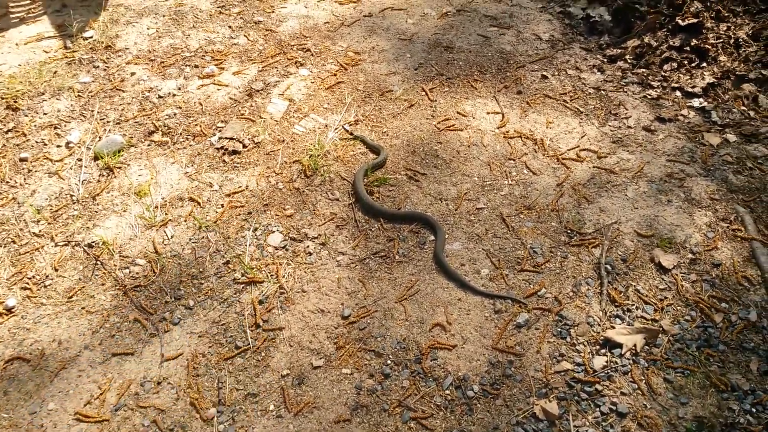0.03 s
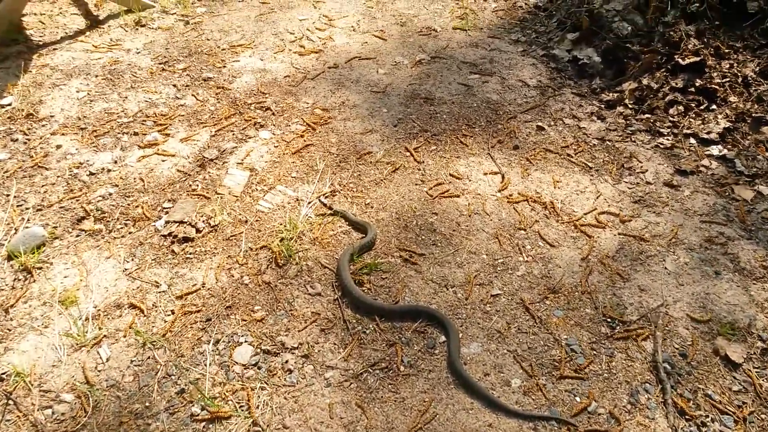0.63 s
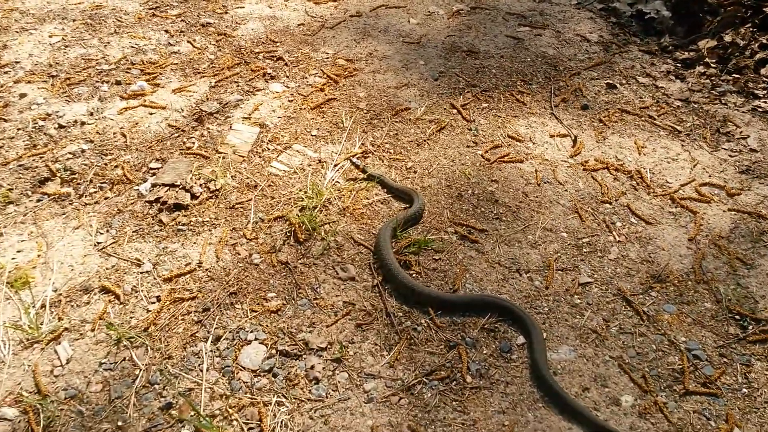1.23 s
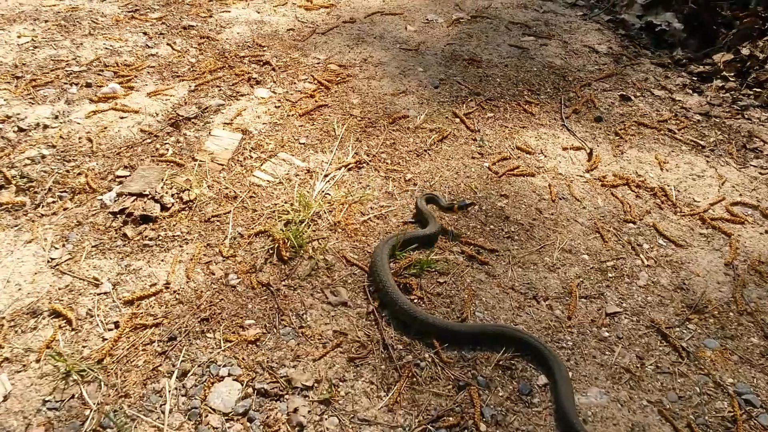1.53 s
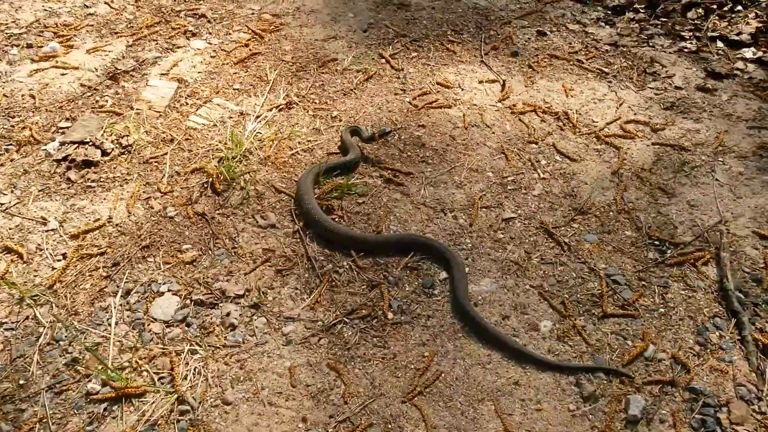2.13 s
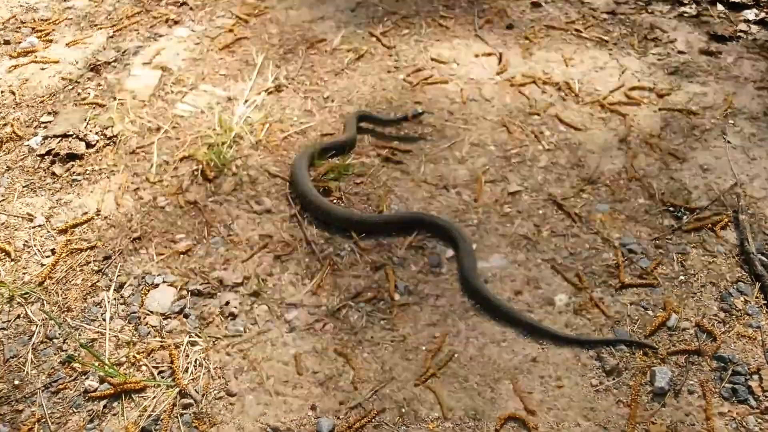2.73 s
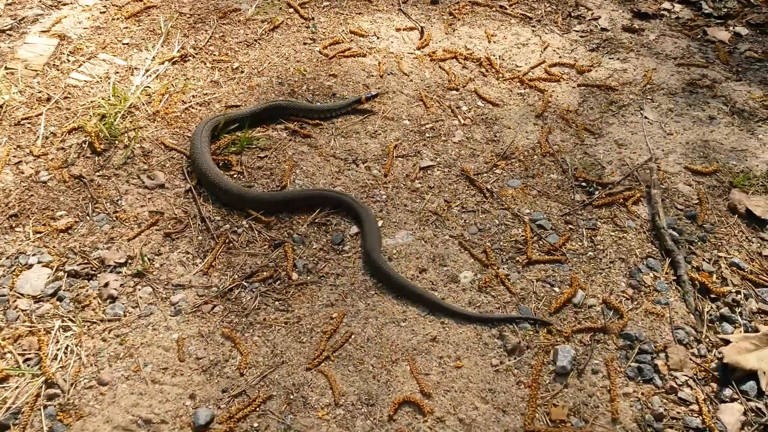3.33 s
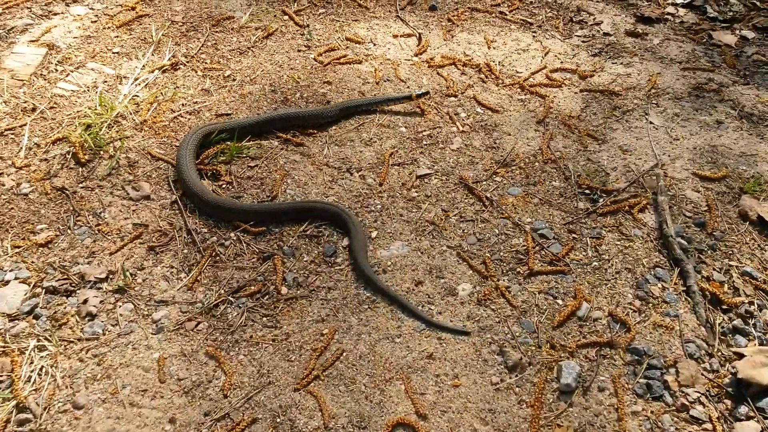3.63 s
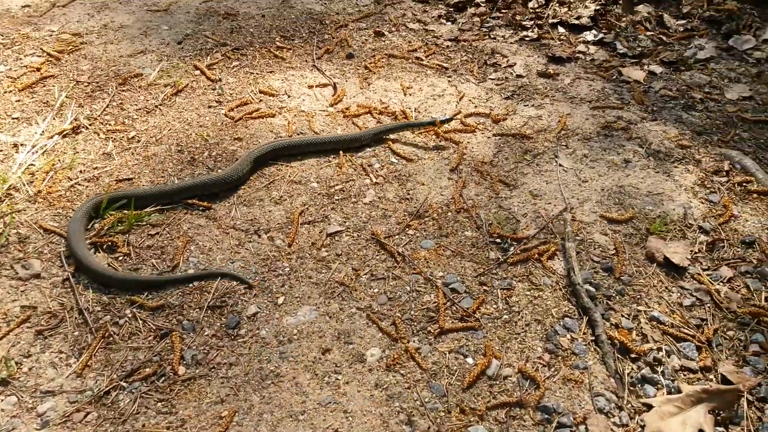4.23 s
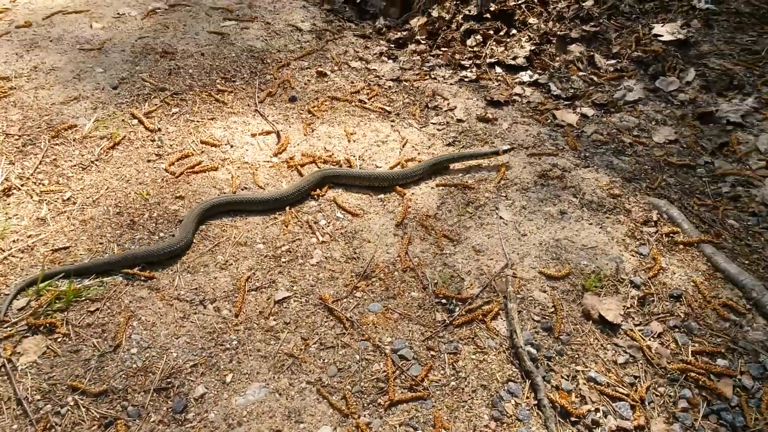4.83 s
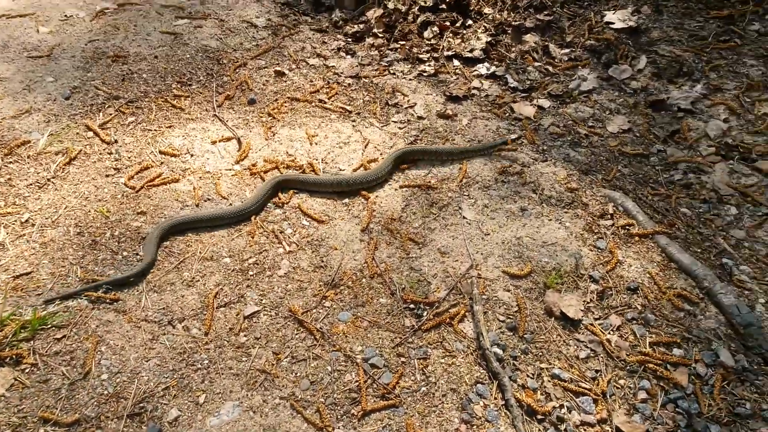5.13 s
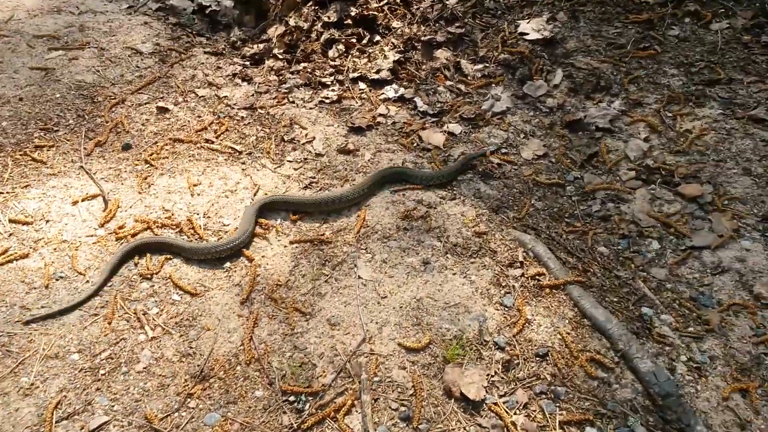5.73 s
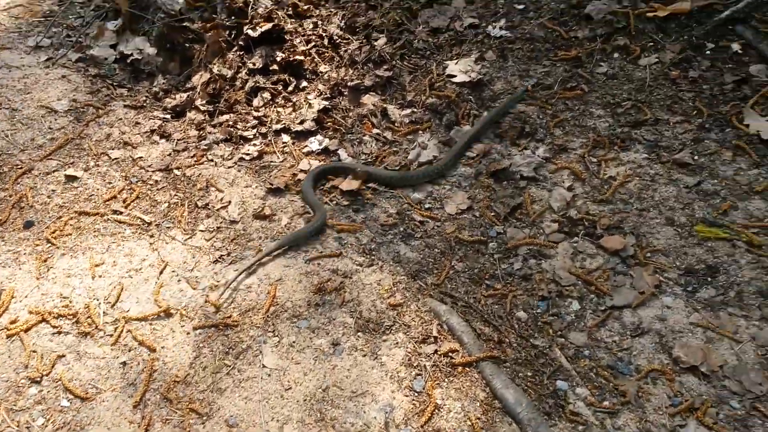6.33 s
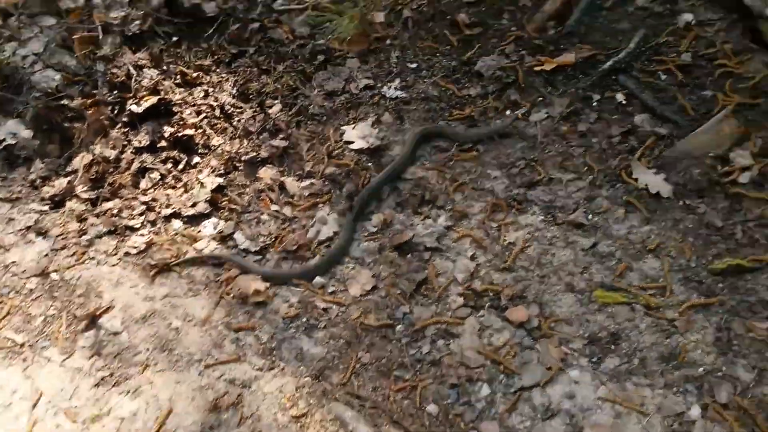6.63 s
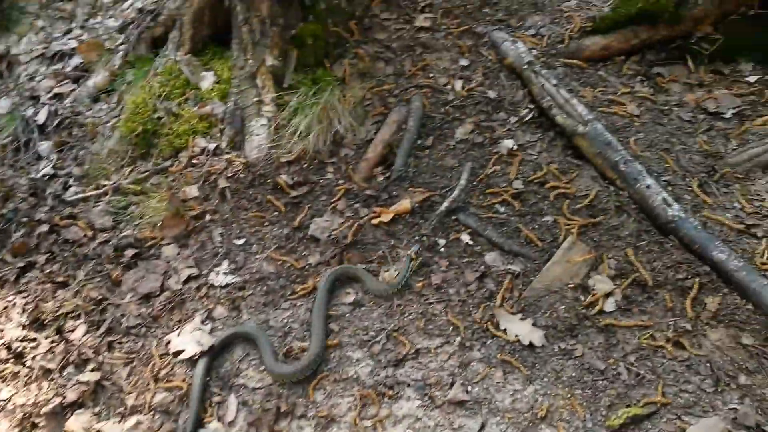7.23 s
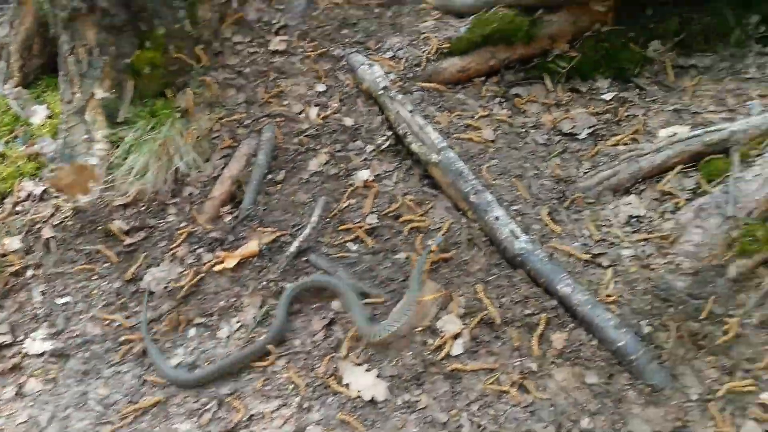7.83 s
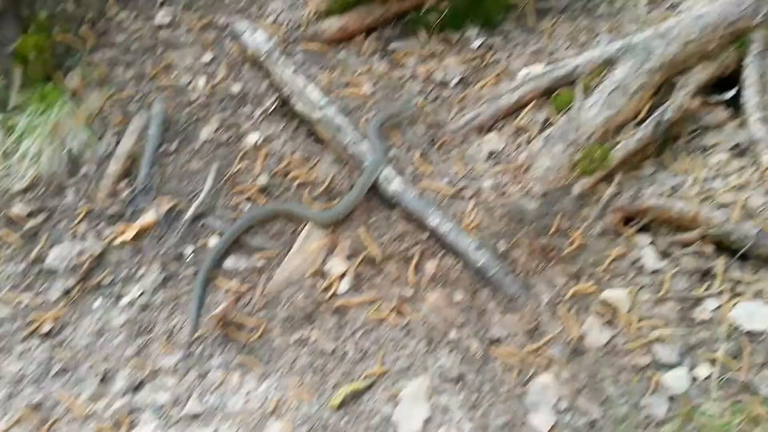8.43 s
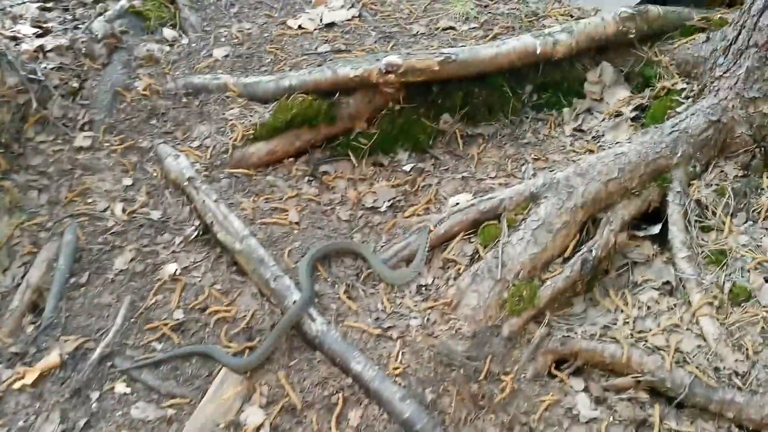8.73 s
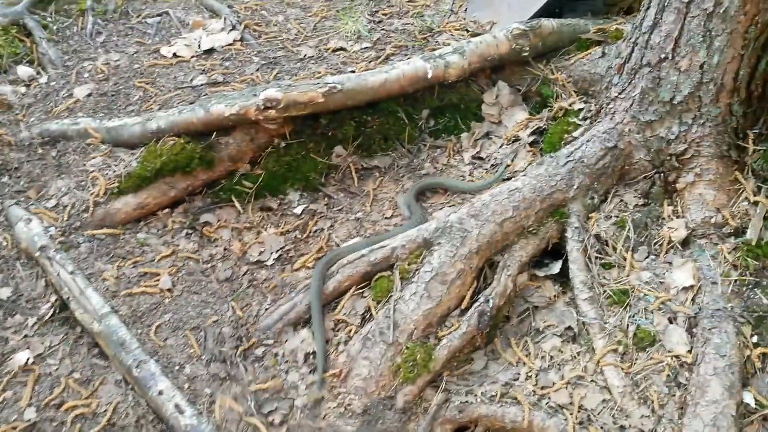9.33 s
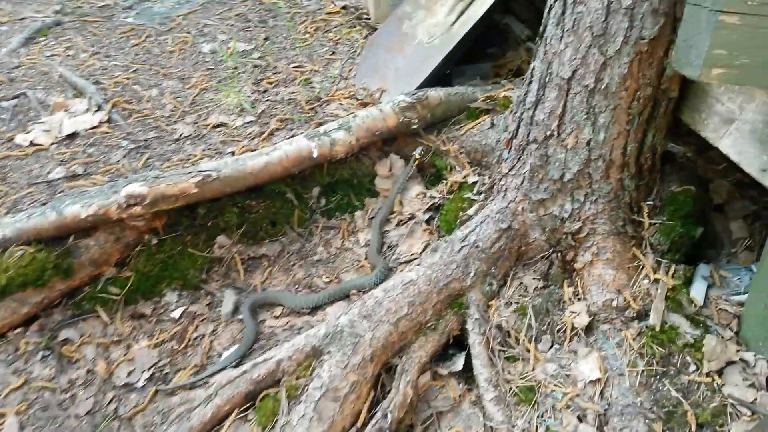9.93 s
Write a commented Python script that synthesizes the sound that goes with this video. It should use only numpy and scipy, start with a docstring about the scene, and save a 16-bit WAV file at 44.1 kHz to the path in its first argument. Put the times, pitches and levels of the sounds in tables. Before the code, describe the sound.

Close handling bumps and rubs, then the faint, growing rustle of a snake crossing dry forest litter as light footsteps follow.

```python
"""A snake slides over dry needles and leaves, which hiss by friction and crackle by brittle fracture.
Someone follows on the forest path with a hand-held camera, crunching grit underfoot; both are heard
at the right microphone port. Fingers bump and rub the left port, which the hand shades.
Each port has its own handling rumble and hiss; a small bird calls faintly and the camera whines softly."""
import sys
import numpy as np
from scipy import signal
from scipy.fft import rfft, irfft, next_fast_len
from scipy.io import wavfile
from scipy.ndimage import uniform_filter1d

SR = 44100
rng = np.random.default_rng(int(sys.argv[2]) if len(sys.argv) > 2 else 0)


def persist_wave(psi):
    """Save psi, clipped to +-1, as 16-bit WAV."""
    counts = np.round(np.clip(psi, -1, 1) * 32767).astype(np.int16)
    wavfile.write(sys.argv[1], SR, np.atleast_2d(counts).T)


N = 439677
TIME = np.arange(N) / SR
TOP_HZ = 14600
# course of the hiss and, with it, of the hand's tremor (time [s], relative level [dB])
NOISE_FLOOR = [(0, -66.5), (1.3, -70), (1.95, -70), (2.8, -81), (4.1, -75), (4.87, -79), (6.4, -67),
               (9.16, -68), (9.97, -66.5)]


def snake(rate=300, spread_db=3.5, patchy_db=1.56, break_s=0.0016, snap_s=0.0014, settle_s=0.017):
    """Friction and brittle fracture: litter hisses and crackles with each push; single needles snap."""
    # spectrum of dry litter (frequency [Hz], gain [dB])
    leaf_spectrum = [(1200, -27.5), (2400, -23), (3500, -21.5), (7000, -19), (8400, -14), (9500, -14.5),
                     (10800, -5), (12400, -2), (13500, -9.5), (14600, -14)]
    # brittleness of the litter (time [s], ratio of breaking to sliding [dB])
    brittleness = [(5.4, 0), (6.0, -7.5), (8.2, -1), (8.6, 1)]
    # steady sliding, faint on bare soil and loud on leaves (time [s], relative level [dB])
    glide = [(0, -59.5), (0.75, -52.5), (1.05, -68.5), (2.15, -62), (2.5, -77), (3.3, -74.5), (3.87, -62),
             (4.95, -68.5), (5.35, -63.5), (5.4, -53.5), (5.7, -53.5), (6.3, -44.5), (7.4, -43), (7.8, -40),
             (8.6, -47.5), (9.28, -43), (9.97, -35)]
    # pushes of the body (start [s], duration [s], relative level [dB])
    pushes = [(1.72, 0.036, -47), (5.088, 0.033, -49.5), (5.92, 0.11, -52), (6.34, 0.15, -39.5),
              (6.68, 0.041, -35), (6.83, 0.088, -33.5), (7.0, 0.12, -39), (7.565, 0.032, -29.5),
              (7.92, 0.28, -37), (8.24, 0.2, -31.5), (9.33, 0.14, -34.5), (9.53, 0.2, -33)]
    # needles and leaves snapping (time [s], relative peak level [dB])
    snaps = [(0.105, -32), (0.213, -26), (0.542, -28), (0.58, -33), (1.751, -28), (5.091, -24.5),
             (5.473, -15.5), (5.685, -29.5), (7.129, -19), (7.553, -17), (7.974, -16), (8.423, -10.5),
             (8.486, -12.5), (8.594, -26), (8.693, -21), (8.864, -17), (8.879, -17), (8.897, -20.5),
             (9.311, -17), (9.378, -11), (9.412, -13), (9.48, -15), (9.513, -5), (9.548, -10.5),
             (9.566, -5), (9.574, -10), (9.601, -11), (9.645, -12), (9.658, -16), (9.677, -7), (9.693, -11),
             (9.796, -13)]
    t = np.arange(2048) / SR
    breaking = np.abs(signal.fftconvolve(grains(rate, spread_db) ** 2, np.exp(-2 * t / break_s))[:N])
    ratio = swell(brittleness) ** 2
    energy = (1 + ratio * breaking / breaking.mean()) / (1 + ratio)
    bursts = np.sqrt(energy) * rng.standard_normal(N) * undb(patchy_db * drift(50))
    effort = np.hypot(swell(glide), strokes(pushes, attack_s=0.082, release_s=0.19))
    rustle = shimmer(colour(bursts, leaf_spectrum), rate=11, depth_db=2)
    out = unit(case_echo(rustle)) * effort * undb(2)
    needle_band = signal.butter(1, [10200, 12800], "band", fs=SR, output="sos")
    snap_and_settle = np.exp(-(t / snap_s) ** 2) + undb(-22) * np.exp(-t / settle_s)
    for s, db in snaps:
        crack = rng.choice([-1, 1], len(t)) * snap_and_settle
        add(out, s, colour(signal.sosfilt(needle_band, crack), leaf_spectrum), db - 2)
    return out


def shimmer(x, rate, depth_db, count=18):
    """Independent amplitude modulation: bands swell and fade as one leaf after another takes over."""
    size = next_fast_len(N)
    spectrum, hz = rfft(x, size), np.fft.rfftfreq(size, 1 / SR)
    centres = np.linspace(0, TOP_HZ, count)
    bands = (irfft(spectrum * np.interp(hz, centres, row), size)[:N] for row in np.eye(count))
    return sum(band * undb(depth_db * drift(rate)) for band in bands)


def footsteps(rate=750, spread_db=2, patchy_db=2, ring_s=0.00082):
    """Granular friction: sand slips under the soles; struck stones click as heavily damped resonators."""
    # spectrum of sandy soil (frequency [Hz], gain [dB])
    soil_spectrum = [(100, -2), (400, -0.5), (1100, -4.5), (1700, -5), (2500, -18), (4200, -16),
                     (7000, -27.5)]
    # soles pressing down (start [s], duration [s], level [dB])
    steps = [(0.62, 0.25, -56.5), (2.02, 0.25, -60.5), (5.04, 0.043, -57.5), (5.385, 0.12, -51),
             (5.603, 0.039, -51.5), (5.7, 0.11, -59), (6.42, 0.058, -49), (6.61, 0.081, -43),
             (7.05, 0.043, -49.5), (7.378, 0.032, -41), (7.46, 0.14, -44), (7.73, 0.62, -53.5),
             (8.24, 0.1, -47), (8.41, 0.12, -45.5), (8.71, 0.25, -51.5), (9.69, 0.063, -48.5),
             (9.85, 0.074, -48.5)]
    # light scuffing once the follower walks (start [s], duration [s], level [dB])
    scuffing = [(5.65, 6.1, -61)]
    # small stones and twigs (time [s], relative peak level [dB], frequency [Hz])
    stones = [(0.533, -31.5, 3500), (0.662, -22, 880), (0.699, -28, 1010), (0.747, -27, 970),
              (0.76, -21.5, 810), (1.746, -25.5, 2200), (6.821, -27, 880), (7.384, -21, 760),
              (7.403, -28, 900), (7.483, -22, 774), (7.733, -25, 1010), (7.801, -26, 1070),
              (8.211, -28.5, 1970), (8.281, -19.5, 764), (8.326, -27, 1050), (8.748, -26, 990),
              (8.797, -26, 920), (8.856, -29.5, 860), (8.875, -29, 1180), (8.943, -22, 960),
              (9.652, -22.5, 1800), (9.724, -18, 1130)]
    crunch = grains(rate, spread_db) * undb(patchy_db * drift(60))
    weight = np.hypot(strokes(steps, attack_s=0.012, release_s=0.064),
                      strokes(scuffing, attack_s=0.3, release_s=0.2))
    out = unit(case_echo(colour(crunch, soil_spectrum))) * weight
    t = np.arange(512) / SR
    for s, db, hz in stones:
        add(out, s, np.sin(2 * np.pi * hz * t) * np.exp(-t / ring_s), db - 1)
    return out


def finger_bumps(low_cut_hz=75, let_go_ms=1.5, lead_s=0.02):
    """High-pass transient response: the microphone's bass cut turns each pressure pulse into a wobble."""
    # finger impacts (time [s], relative peak level [dB], contact time [ms], port [0 left, 1 right])
    impacts = [(0.061, -25.5, 0.14, 0), (0.11, -26.5, 0.12, 0), (0.147, -24.5, 0.14, 0),
               (0.179, -23, 1.2, 0), (0.264, -27, 0.91, 0), (0.308, -21.5, 1.3, 0), (0.587, -25, 3.2, 0),
               (0.654, -27, 1, 0), (0.828, 1.5, 2.8, 0), (0.912, -7.5, 1.15, 0), (0.927, -8, 2.7, 0),
               (0.955, -7, 2.1, 0), (0.976, -2.5, 0.52, 0), (0.988, -3, 0.55, 0), (1.006, -5, 0.93, 0),
               (1.152, -18, 0.12, 0), (1.21, -18.5, 0.13, 0), (1.243, -24.5, 0.15, 0),
               (1.305, -4.5, 0.22, 0), (1.393, -30, 0.16, 0), (1.876, -24.5, 1.3, 0), (2, -31.5, 2.2, 1),
               (2.201, -37, 0.51, 0), (2.318, -43, 0.26, 0), (2.409, -22, 0.12, 0), (3.489, -45.5, 1.7, 1),
               (3.611, -45.5, 0.2, 1), (3.678, -41, 0.15, 0), (4.091, -42.5, 0.71, 0), (4.353, -46, 2, 0),
               (4.942, -48.5, 1.5, 0), (5.873, -28.5, 1.8, 1), (7.31, -27.5, 1.5, 0), (7.794, -20, 2, 1),
               (8.259, -20, 1.05, 1), (8.291, -23.5, 0.76, 1), (8.324, -21.5, 1.4, 1), (8.965, -28, 1.7, 0),
               (9.063, -33.5, 0.42, 0)]
    out = np.zeros((2, N))
    ms = 1000 * (np.arange(int(3 * lead_s * SR)) / SR - lead_s)
    bass_cut = signal.butter(2, low_cut_hz, "high", fs=SR, output="sos")
    for s, db, contact_ms, port in impacts:
        fall_ms = max(contact_ms, let_go_ms)
        pulse = -np.exp(-np.logaddexp(-ms / contact_ms, ms / fall_ms))  # exponential rise and fall
        add(out[port], s - lead_s, signal.sosfilt(bass_cut, pulse), db + 1)
    return out


def finger_friction(firm_db=-31, soft_hz=900):
    """Stick-slip friction: skin scrapes the port, duller at a light touch, and brushes along the case."""
    # spectrum of rubbing skin (frequency [Hz], gain [dB])
    skin_spectrum = [(30, -16.5), (130, 1), (300, -3.5), (600, -9), (1300, -18.5), (3000, -31.5),
                     (8000, -50.5), (14500, -50.5)]
    # drags over the port (start [s], duration [s], relative level [dB])
    rubs = [(0.655, 0.19, -47), (0.83, 0.0094, -25.5), (0.876, 0.004, -38), (0.912, 0.19, -33.5),
            (0.986, 0.022, -15), (1.07, 0.027, -21), (1.152, 0.0069, -31.5), (1.209, 0.0081, -27.5),
            (1.293, 0.013, -26), (1.33, 0.12, -50), (1.865, 0.023, -33.5), (1.915, 0.0095, -36)]
    # light strokes along the case (start [s], duration [s], relative level [dB])
    brushes = [(1.425, 0.18, -60), (1.535, 0.01, -46), (1.695, 0.056, -50.5), (1.802, 0.0073, -42)]
    # spectrum of brushing (frequency [Hz], gain [dB])
    brush_spectrum = [(800, 4), (2600, -4), (5000, 0), (6300, -22), (14000, -37)]
    slips = unit(colour(grains(rate=4000, spread_db=2), skin_spectrum))
    force = strokes(rubs, attack_s=0.046, release_s=0.025)
    dull = signal.sosfilt(signal.butter(1, soft_hz, fs=SR, output="sos"), slips)
    firmness = force / (force + undb(firm_db))
    rub = force * (dull + firmness * (slips - dull))
    brush = unit(colour(grains(rate=1700, spread_db=5.5), brush_spectrum))
    brush *= strokes(brushes, attack_s=0.0326, release_s=0.06)
    return rub * undb(1.5) + brush * undb(2)


def grip(port, tremor_db, rate=130, spread_db=2, patchy_db=4):
    """Structure-borne sound: small shifts of the hand come in bunches and thud through the case."""
    # spectrum of handling rumble (frequency [Hz], gain [dB])
    rumble_spectrum = [(15, -19), (45, 3), (110, 0), (170, -7), (300, -23.5), (700, -27), (2000, -66)]
    # changes of grip (start [s], duration [s], relative level left [dB], relative level right [dB])
    shifts = [(0, 0.36, -38, -54), (0.426, 0.56, -47.5, -55), (0.848, 0.15, -22, -62),
              (1.066, 0.17, -40, -67.5), (1.786, 0.25, -51.5, -46.5), (2.178, 0.29, -60.5, -63),
              (3.482, 0.7, -69.5, -67), (5.388, 0.69, -59.5, -58), (5.85, 0.15, -62, -45),
              (7.448, 0.49, -66, -36.5), (7.767, 0.33, -59, -45.5), (8.268, 0.039, -50, -25.5),
              (8.37, 0.21, -49, -43), (8.68, 0.43, -59, -47.5)]
    moves = [(s, length, levels[port]) for s, length, *levels in shifts]
    thuds = grains(rate, spread_db) * undb(patchy_db * np.tanh(2 * drift(13)))
    tremor = swell(NOISE_FLOOR) * undb(tremor_db)
    force = np.hypot(strokes(moves, attack_s=0.08, release_s=0.088), tremor)
    return unit(colour(thuds, rumble_spectrum)) * force


def bird(start_hz=7600, end_hz=6780, waver_db=4, quaver_hz=110):
    """Frequency and amplitude modulation: thin distant whistles slide down, blurred in pitch and level."""
    # falling notes (start [s], duration [s], relative peak level [dB])
    notes = [(0.231, 0.069, -54.5), (0.358, 0.087, -60), (0.514, 0.075, -56)]
    out = np.zeros(N)
    waver, quaver = undb(waver_db * drift(131.5)), quaver_hz * drift(500)
    for s, length, db in notes:
        progress = np.linspace(0, 1, int(length * SR))
        hz = start_hz + (end_hz - start_hz) * progress + quaver[int(s * SR):][:len(progress)]
        envelope = np.sqrt(progress * (1 - progress))
        add(out, s, np.sin(2 * np.pi * np.cumsum(hz) / SR) * envelope, db)
    return out * waver


def hiss():
    """Broadband random noise: outdoor air and microphone hiss, slightly restless in level."""
    # spectrum of air and microphone noise (frequency [Hz], gain [dB])
    air_spectrum = [(100, 17), (300, 13.5), (700, 7.5), (1500, 4), (9000, -1.5)]
    noise = unit(colour(rng.standard_normal(N), air_spectrum))
    return noise * swell(NOISE_FLOOR) * undb(11.5 + 0.5 * drift(4.7))


def camera_whine(centre_hz=12300, jitter_hz=6, level_db=-84):
    """Narrow-band frequency modulation: the camera's faint, high tone wanders slightly."""
    hz = centre_hz + jitter_hz * drift(30.07)
    return undb(level_db) * unit(np.sin(2 * np.pi * np.cumsum(hz) / SR))


def case_echo(x):
    """Comb filtering: a dull, inverted echo off the camera body cuts notches that shift as it tilts."""
    # lag of the reflection (time [s], nominal delay [ms])
    delays = [(6.6, 0.415), (7.45, 0.41), (8.0, 0.445), (8.3, 0.395), (9.5, 0.455), (9.85, .41)]
    delay_s = np.interp(TIME, *np.transpose(delays)) / 1000 * (1 + 0.025 * drift(6))
    echo = np.interp(np.arange(N) - delay_s * SR, np.arange(N), uniform_filter1d(x, size=4))
    strength = 0.66 * (1 + 0.25 * np.tanh(drift(4)))
    return x - strength * echo


def grains(rate, spread_db):
    """Poisson process: on average `rate` impulses a second, many weak and a few strong."""
    happens = rng.random(N) < rate / SR
    strength = undb(spread_db * np.minimum(rng.exponential(size=N), 4.5))
    return happens * strength * rng.choice([-1, 1], N)


def colour(x, spectrum, size=4096):
    """Minimum-phase filtering: shapes the spectrum while clicks keep a sharp front."""
    hz, db = np.transpose(spectrum)
    bins = np.maximum(np.fft.rfftfreq(size, 1 / SR), 1)
    gain = undb(np.interp(np.log(bins), np.log(hz), db))
    cepstrum = irfft(np.log(gain))
    cepstrum[1:size // 2] *= 2
    cepstrum[size // 2 + 1:] = 0
    impulse_response = irfft(np.exp(rfft(cepstrum)))
    return signal.fftconvolve(x, impulse_response)[:len(x)]


def strokes(rows, attack_s, release_s):
    """Power summation of envelopes that rise, hold and decay; brief strokes have quicker edges."""
    power = np.zeros(N)
    for s, length, db in rows:
        rise, fall = min(attack_s, 2 * length), min(release_s, 2 * length)  # time for 20 dB
        span = slice(*np.searchsorted(TIME, [s - 4 * rise, s + length + 4 * fall]))
        t = TIME[span] - s
        edges = np.maximum(-t, 0) / rise + np.maximum(t - length, 0) / fall
        power[span] += undb(db - 20 * edges) ** 2
    return np.sqrt(power)


def drift(rate):
    """Low-pass noise of rms 1, gliding to `rate` new values a second."""
    hold = max(int(SR / rate), 1)
    stairs = np.repeat(rng.standard_normal(N // hold + 1), hold)
    return unit(uniform_filter1d(stairs, hold)[:N])


def swell(curve):
    """Gain envelope interpolated through rows of (time [s], level [dB])."""
    return undb(np.interp(TIME, *np.transpose(curve)))


def add(track, s, sound, db):
    """Superposition: mix a sound in at time s with the given peak level."""
    start = max(int(s * SR), 0)
    part = sound[:max(N - start, 0)]
    track[start:start + len(part)] += undb(db) * part / np.abs(sound).max()


def undb(db):
    """Decibels to amplitude ratio."""
    return 10 ** (np.asarray(db) / 20)


def unit(x):
    """Normalisation to rms 1."""
    return x / np.sqrt(np.mean(x ** 2))


def scene():
    """Acoustic shadow: the hand shades the left port, so only a trace of scattered rustle reaches it."""
    whine = camera_whine()
    left_grip = grip(port=0, tremor_db=6) * undb(6.5)
    right_grip = grip(port=1, tremor_db=8.5) * undb(-1)
    left = finger_friction() + left_grip + hiss() + undb(-33.5) * snake()
    right = snake() + footsteps() + bird() + whine + right_grip + hiss()
    return np.array([left, right]) + finger_bumps()


def record(dry):
    """Soft saturation rounds off the hardest bumps; a steep low-pass filter limits the bandwidth."""
    rounded = dry / (1 + dry ** 6) ** (1 / 6)
    return signal.sosfilt(signal.ellip(10, 0.2, 70, TOP_HZ, fs=SR, output="sos"), rounded)


dry = scene()
out = record(dry)
persist_wave(out)
```